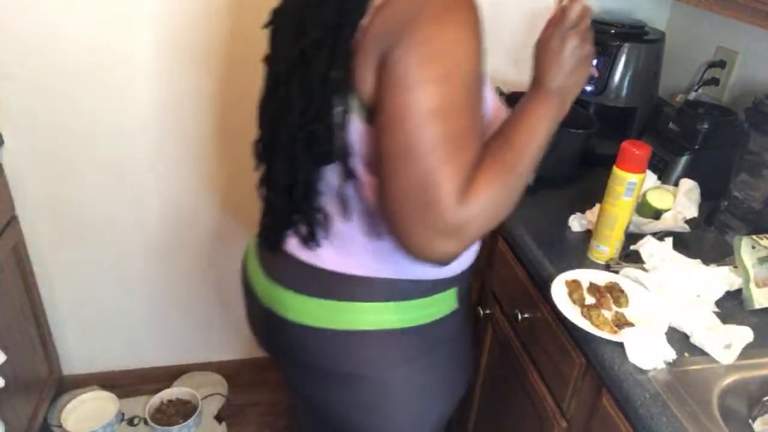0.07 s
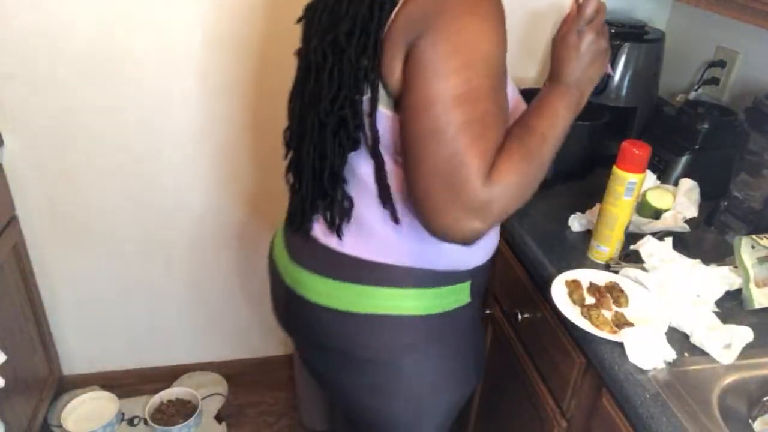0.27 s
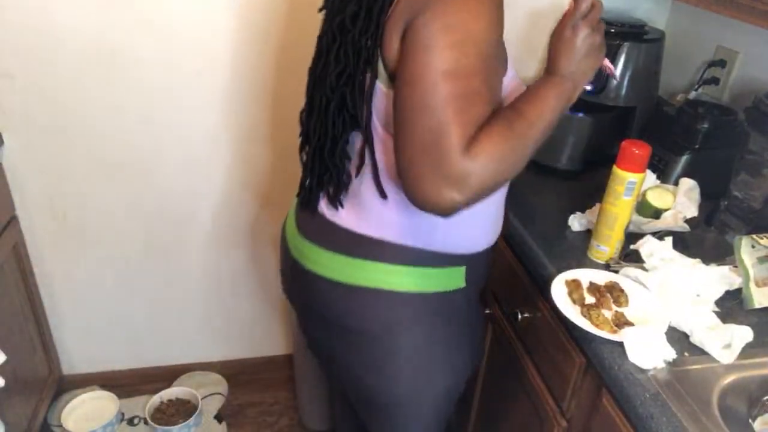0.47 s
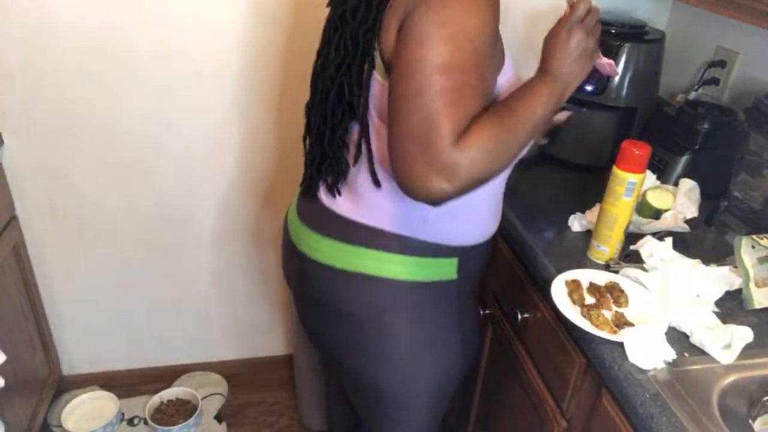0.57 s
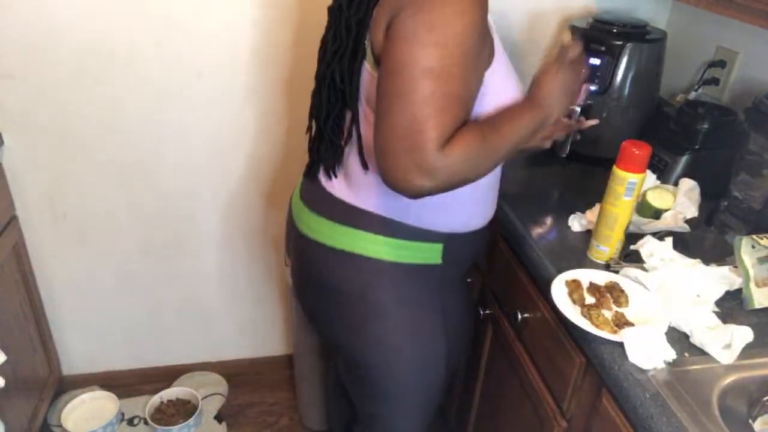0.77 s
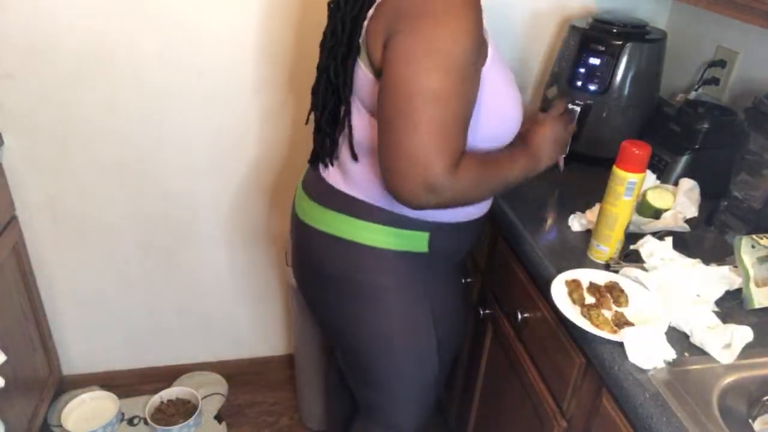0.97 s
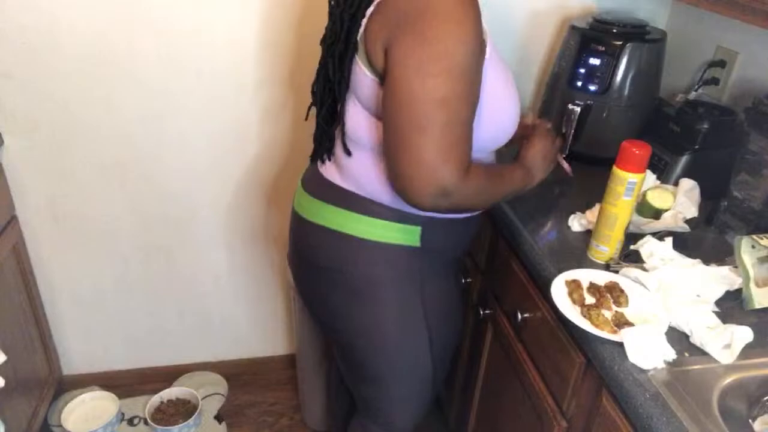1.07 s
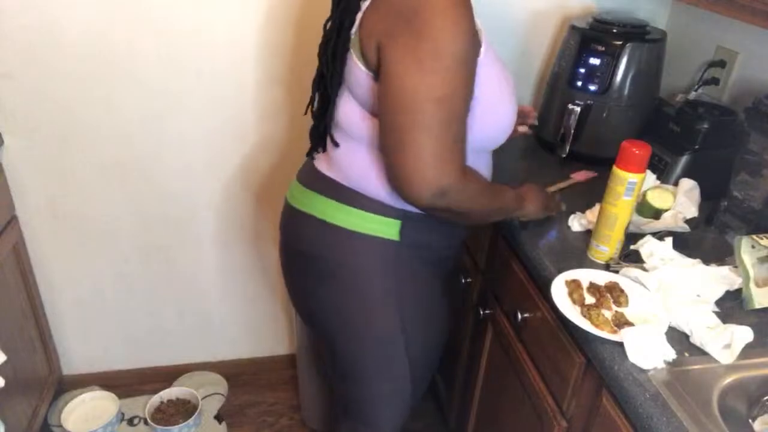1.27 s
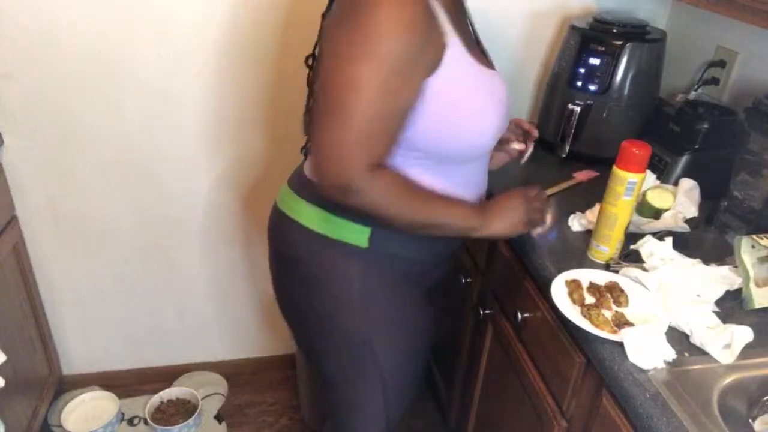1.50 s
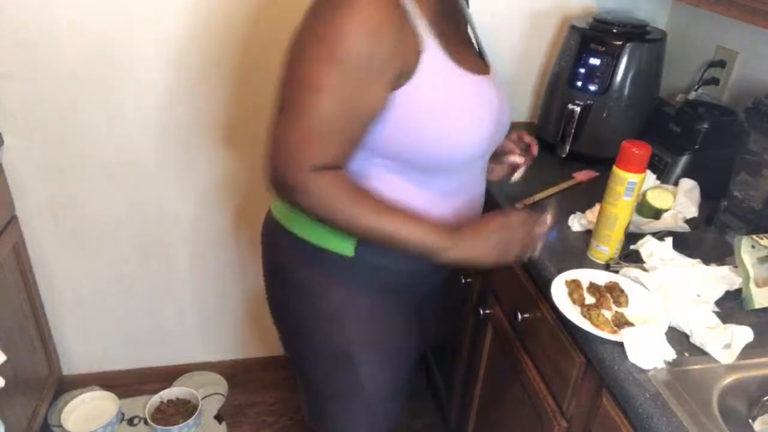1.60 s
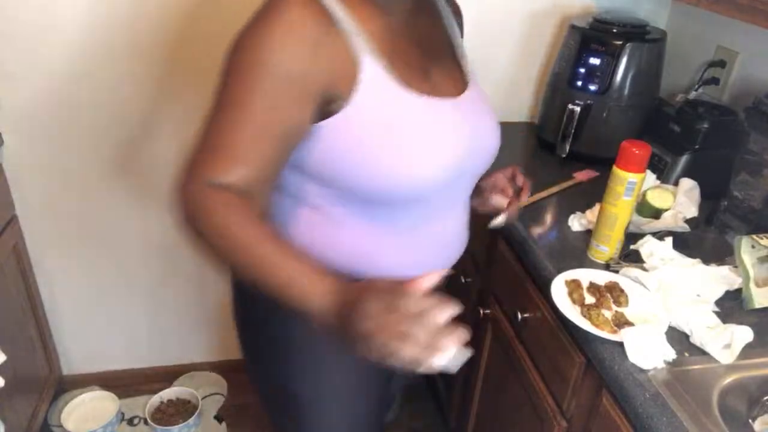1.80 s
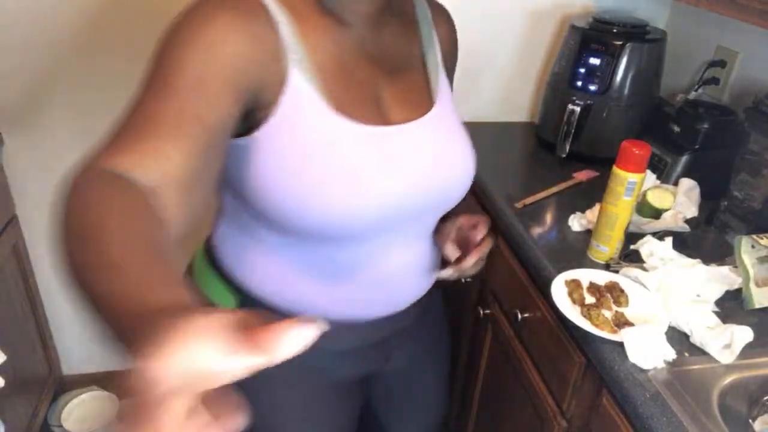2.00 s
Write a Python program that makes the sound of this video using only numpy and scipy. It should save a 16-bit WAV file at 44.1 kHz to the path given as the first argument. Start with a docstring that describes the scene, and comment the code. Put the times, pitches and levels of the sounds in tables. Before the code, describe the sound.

An air fryer basket bumps, scrapes along its runners and clunks shut, hollow and rattly, over a low fan hum; then a utensil clicks on the counter. Close phone microphone in a small kitchen.

```python
"""Air fryer basket going home

In a small kitchen, an air fryer's basket is set on its runners, scrapes in and shuts with a hollow clunk:
damped low notes, ringing housing modes, a dense pan rattle and random catches along the runners.
The fan, two tones and hum over coloured noise, coasts and then spins up; its rush is muffled as the basket shuts.
A moment later a utensil clicks down on the counter and bounces, as short bursts of decaying noise."""
import sys
import numpy as np
from scipy import signal
from scipy.fft import rfft, irfft
from scipy.io import wavfile

SR = 44100
rng = np.random.default_rng(int(sys.argv[2]) if len(sys.argv) > 2 else 0)


def store_wav(level_fs):
    """Save 16-bit WAV to argv[1]."""
    pcm = np.round(np.clip(np.atleast_2d(level_fs), -1, 1) * 32767)
    wavfile.write(sys.argv[1], SR, pcm.T.astype(np.int16))


N = 90404  # length in samples

# bumps of the basket: start_s, thump_db, thump_pitch_hz, housing_db, pan_clatter_db, edge_tick_db
BASKET_BUMPS = [(0.148, -38, 155, -60, -28, -42), (0.164, -27.5, 158, -57, -42, -60),
                (0.207, -17.5, 261.6, -33, -33.5, -43), (0.236, -18.5, 266.4, -46, -40, -56),
                (0.327, -61, 292, -42, -32.5, -46), (0.397, -31, 283, -53, -52, -45.5),
                (0.423, -25, 227, -39, -26, -30), (0.44, -16.5, 224, -42, -19, -27.5),
                (0.452, -14.5, 250.5, -26, -22, -47), (0.499, -56, 252, -31, -45, -36),
                (0.547, -18, 295, -28, -23, -25.5), (0.595, -19, 259, -13.5, -17.5, -53),
                (0.624, -14.5, 240.4, -19, -21, -39), (0.667, -6, 231.8, -43, -34, -54),
                (0.686, -13.5, 262, -10.5, -15.5, -49), (0.697, -10, 208.4, -18.5, -17, -55),
                (0.712, -8, 263.1, -19.5, -35, -54)]
# spectrum of the pan's dense ring: frequency_hz, density_db_per_hz (relative)
PAN_COLOUR = [(30, -50), (70, -6), (150, 1), (380, 4), (620, 2.5), (1000, -3), (1500, -16), (2300, -24),
              (3500, -28), (5000, -35.5), (15000, -63)]
PAN_T60_S = 0.068
CONTACT_S = 0.001  # default build-up time of a dense ring


def undb(db):
    """Decibels to gain."""
    return 10 ** (np.asarray(db) / 20)


def unit(x):
    """Scale to rms 1."""
    return x / np.sqrt(np.mean(x ** 2))


def unit_energy(response):
    """Scale an impulse response to a total energy of 1."""
    return response / np.sqrt(np.sum(response ** 2))


def seconds():
    """Time of every sample."""
    return np.arange(N) / SR


def bins():
    """Frequency of every spectral bin."""
    return np.arange(N // 2 + 1) * SR / N


def along(points, hz):
    """Read (Hz, value) points on a log-frequency axis."""
    point_hz, value = np.array(points).T
    return np.interp(np.log(hz + 1), np.log(point_hz), value)


def noise(colour):
    """Noise of rms 1 with a given spectrum."""
    spectrum = rfft(rng.standard_normal(N)) * undb(along(colour, bins()))
    return unit(irfft(spectrum, N))


def walk(rate_hz):
    """Slow random drift of rms 1, smoothed by a Gaussian low-pass."""
    spectrum = rfft(rng.standard_normal(N)) * np.exp(-(bins() / rate_hz) ** 2)
    return unit(irfft(spectrum, N))


def through(x, response):
    """Pass a signal through an impulse response."""
    return signal.fftconvolve(x, response)[:N]


def fade(t, t60_s):
    """Exponential decay that loses 60 dB in t60_s."""
    return np.exp(-np.log(1000) * t / t60_s)


def blows(times_s, db):
    """One impulse for each contact."""
    out = np.zeros(N)
    np.add.at(out, (times_s * SR).astype(int), undb(db))
    return out


def ring(modes):
    """Response of a few clear modes, each a decaying sine (Hz, dB, t60 s)."""
    t = seconds()
    return sum(undb(db) * np.sin(2 * np.pi * hz * t) * fade(t, t60_s) for hz, db, t60_s in modes)


def crash(colour, t60_s, swell_s=CONTACT_S):
    """Response of modes too dense to tell apart: decaying noise that builds up over a moment."""
    t = seconds()
    return noise(colour) * fade(t, t60_s) * (1 - np.exp(-t / swell_s))


def thumps():
    """Each bump of the basket gives one low, quickly damped note with a soft onset."""
    t60_s, rise_s = 0.11, 0.0051
    out = np.zeros(N)
    swell = 1 - np.exp(-(seconds() / rise_s) ** 2)
    for start_s, thump_db, pitch_hz, *_ in BASKET_BUMPS:
        at = int(start_s * SR)
        note = swell * ring([(pitch_hz, thump_db, t60_s)])
        out[at:] += note[:N - at]
    return out


def housing():
    """Ring of the hollow housing, which radiates neither deep bass nor treble."""
    # modes of the housing, before the band-pass: pitch_hz, level_db, t60_s
    modes = [(142, -28, 0.22), (181.4, -10.5, 0.44), (255.7, -8.5, 0.27), (393.2, -12, 0.27),
             (434.7, -16.5, 0.24), (493.6, -12.5, 0.175), (582.7, -12, 0.27), (615, -13, 0.17),
             (686.8, -14, 0.15), (748.3, -20.5, 0.28), (811, -26, 0.27), (905, -24, .18),
             (1011, -30.5, 0.27), (1355, -26.5, 0.12), (1684, -20, .05)]
    radiation = signal.butter(2, [150, 1500], "band", fs=SR, output="sos")
    return signal.sosfilt(radiation, ring(modes))


def knocks():
    """Each bump rings the housing, rattles the pan and ticks at its edge."""
    # spectrum of the pan edge's tick: frequency_hz, density_db_per_hz (relative)
    edge_colour = [(300, 15), (1500, -3.5), (2500, 3.5), (3700, 7), (4600, -4.5), (5500, 0.5), (6500, -13),
                   (8000, -6), (11000, -13), (15500, -25)]
    edge_t60_s, pan_swell_s = 0.026, 0.0044
    start_s, _, _, housing_db, pan_db, edge_db = np.array(BASKET_BUMPS).T
    out = through(blows(start_s, housing_db), housing())
    for at, clatter_db, tick_db in zip((start_s * SR).astype(int), pan_db, edge_db):
        clatter = undb(clatter_db) * crash(PAN_COLOUR, PAN_T60_S, pan_swell_s)
        tick = undb(tick_db) * crash(edge_colour, edge_t60_s)
        out[at:] += (clatter + tick)[:N - at]
    return out


def scrape():
    """The runners catch and slip hundreds of times a second, shaking pan and housing, with grit and hiss."""
    # course of the sliding: time_s, grinding_db, grit_db, hiss_db
    slide = [(.13, -44, -69, -76), (.16, -49.5, -58, -60), (.21, -38, -68, -52), (.25, -46, -61, -61),
             (.30, -74, -75, -83), (0.409, -55, -62, -67), (0.449, -31, -40.5, -43),
             (0.479, -36.5, -59, -56.5), (.53, -39, -61, -54.5), (.57, -26, -50, -51.5),
             (.62, -34.5, -52.5, -54.5), (.66, -29.5, -38, -52), (0.679, -33, -55, -51),
             (0.704, -47, -58, -51), (.745, -33.5, -62, -66), (.80, -59, -74, -68)]
    # spectrum of the runners' gritty rub: frequency_hz, density_db_per_hz (relative)
    grit_colour = [(400, -26), (1250, 5.5), (1800, 6), (2500, -5), (3700, -5), (5000, -9), (7000, -14.5),
                   (15000, -38)]
    # spectrum of the runners' hiss: frequency_hz, density_db_per_hz (relative)
    hiss_colour = [(300, -22), (1900, 11), (3000, 1), (6500, -3.5), (8500, 0.5), (11000, -4), (15500, -10)]
    catches_per_s, catch_spread_db = 700, 3
    housing_offset_db, hiss_rough_db = -0.5, 2
    time_s, grind_db, grit_db, hiss_db = np.array(slide).T

    # sparse impulses of random strength, under a drift in level
    caught = rng.random(N) < catches_per_s / SR
    catches = unit(caught * rng.standard_normal(N) * undb(catch_spread_db * walk(40)))

    def course(db):
        return np.interp(seconds(), time_s, db, left=-120, right=-120)

    def rub(response, db):
        return through(catches * undb(course(db)), unit_energy(response))

    pan_grind = rub(crash(PAN_COLOUR, PAN_T60_S), grind_db)
    housing_grind = rub(housing(), grind_db + housing_offset_db)
    grit = rub(crash(grit_colour, PAN_T60_S), grit_db)
    hiss = noise(hiss_colour) * undb(course(hiss_db) + hiss_rough_db * walk(200))
    return pan_grind + housing_grind + grit + hiss


def utensil():
    """A hard, bright click on the counter with a short ring and a few small bounces."""
    # contacts of the utensil: start_s, knock_db, ring_db
    taps = [(1.235, -28.5, -38.5), (1.2389, -32, -45), (1.243, -32.5, -57), (1.268, -39, -69),
            (1.301, -40.5, -74), (1.352, -43.5, -65)]
    # spectrum of its knock on the counter: frequency_hz, density_db_per_hz (relative)
    knock_colour = [(150, -7), (380, 16), (650, 8), (1000, 5), (1700, -1), (2400, -12), (3050, 1.5),
                    (3600, -18), (4400, 0.5), (4900, -7.5), (5600, -5), (7000, -7.5), (9000, -26),
                    (12000, -15), (15500, -19)]
    # spectrum of its bright, dense ring: frequency_hz, density_db_per_hz (relative)
    ring_colour = [(1500, -13), (3000, -16), (7000, -7.5), (8400, 0), (9200, -3), (10700, -5), (12500, -10),
                   (15500, -22)]
    knock_t60_s, ring_t60_s = 0.027, 0.11
    out = np.zeros(N)
    for start_s, knock_db, ring_db in taps:
        at = int(start_s * SR)
        knock = undb(knock_db) * crash(knock_colour, knock_t60_s)
        bright_ring = undb(ring_db) * crash(ring_colour, ring_t60_s)
        out[at:] += (knock + bright_ring)[:N - at]
    return out


def fan_phase():
    """Phase of the blade tone: pitch sinks while coasting, then climbs exponentially towards full speed."""
    coast_hz, coast_hz_per_s, full_hz = 292, 28, 307
    restart_s, spin_up_s = 0.5, 0.56
    t = seconds()
    coasting_hz = coast_hz - coast_hz_per_s * np.minimum(t, restart_s)
    lag = np.exp(-np.maximum(t - restart_s, 0) / spin_up_s)
    blade_hz = full_hz + (coasting_hz - full_hz) * lag
    return 2 * np.pi * np.cumsum(blade_hz) / SR


def fan_air():
    """Rushing air and duct resonances; an extra, brighter rush is heard until the basket shuts it off."""
    # spectrum of the steady rush: frequency_hz, density_db_per_hz (relative)
    rush_colour = [(25, -35), (50, -23.5), (80, -11), (115, -5), (160, -2.5), (195, -0.5), (250, 2.5),
                   (300, -6.5), (340, -12.5), (385, -4.5), (450, -16), (700, -18), (1400, -26), (2300, -33),
                   (3300, -39), (5500, -47), (9000, -49.5), (15500, -52.5)]
    # spectrum of the extra rush while the basket is out: frequency_hz, density_db_per_hz (relative)
    open_colour = [(40, -30), (70, -8), (150, -14), (220, -17), (280, -6), (380, 6), (600, -4.5),
                   (1000, -11.5), (1500, -19.5), (2500, -23.5), (5000, -33), (9000, -48), (15500, -74)]
    # air resonances of the ducts, as narrow noise bands: pitch_hz, width_hz, level_db
    ducts = [(193.2, 23, -47), (247.8, 24, -48.5), (2122, 140, -68.5), (3890, 250, -75)]
    rush_db, open_db = -41.5, -43.5
    open_drop_db = -2.5  # ducts and steady rush are weaker while the basket is out
    t = seconds()
    opening = (t <= 0.59).astype(float)  # 1 while the rush is open, then 0 at once
    duct = 0
    for pitch_hz, width_hz, level_db in ducts:
        drift = signal.hilbert(walk(width_hz))
        carrier = np.exp(2j * np.pi * (pitch_hz - width_hz / 2) * t)
        duct = duct + undb(level_db) * unit(np.real(drift * carrier))
    steady = (duct + undb(rush_db) * noise(rush_colour)) * undb(open_drop_db * opening)
    return steady + undb(open_db) * opening * noise(open_colour)


def fan():
    """Two tones follow the motor's speed, over mains hum and rushing air."""
    # rms levels of the two tones: time_s, blade_db, upper_db
    tone_levels = [(0, -46.5, -59.5), (.4, -46, -76), (.9, -39.5, -62.5), (1.15, -46, -62),
                   (1.32, -39, -62), (1.5, -40, -69.5), (1.65, -41.5, -61), (2.04, -43, -53.5)]
    upper_ratio = 11 / 6  # multiple of the blade tone
    mains_hz, mains_db = 119.1, -56.5
    t, phase = seconds(), fan_phase()
    time_s, blade_db, upper_db = np.array(tone_levels).T
    blade = undb(np.interp(t, time_s, blade_db)) * np.sin(phase)
    upper = undb(np.interp(t, time_s, upper_db)) * np.sin(upper_ratio * phase)
    mains = undb(mains_db) * np.sin(2 * np.pi * mains_hz * t)
    return np.sqrt(2) * (blade + upper + mains) + fan_air()  # root 2 turns rms into peak


def kitchen():
    """Diffuse echo of the room: noise in octave bands that fade at their own rates."""
    # decay time of the echo: frequency_hz, t60_s
    room_t60 = [(200, 0.35), (1000, 0.34), (5000, 0.33), (15000, 0.2)]
    # strength of the echo: frequency_hz, level_db (relative)
    room_colour = [(120, -10), (250, -1), (500, -1.5), (1000, 0.5), (15000, 0)]
    delay_s = 0.0037
    t = seconds() - delay_s
    spectrum, out = rfft(rng.standard_normal(N)), 0
    for hz in 2. ** np.arange(6, 15):  # octave centres, 64 Hz to 16384 Hz
        in_band = (bins() >= hz / np.sqrt(2)) & (bins() < hz * np.sqrt(2))
        band = irfft(spectrum * in_band, N)
        out = out + undb(along(room_colour, hz)) * band * fade(t, along(room_t60, hz)) * (t > 0)
    return unit_energy(out)


def scene():
    """Basket and utensil in the room, over the fan; thumps and fan stay out of the echo."""
    basket_echo_db, tap_echo_db = -9.5, -7
    basket, tap = knocks() + scrape(), utensil()
    echo = through(undb(basket_echo_db) * basket + undb(tap_echo_db) * tap, kitchen())
    return (thumps() + basket + tap + echo + fan())[None]


def record(dry):
    """The phone cuts the deepest bass, below 38 Hz, and the top, above 15650 Hz."""
    low_cut = signal.butter(2, 38, "high", fs=SR, output="sos")
    top_cut = signal.ellip(10, .2, 80, 15650, fs=SR, output="sos")
    return signal.sosfilt(top_cut, signal.sosfilt(low_cut, dry))


dry = scene()
out = record(dry)
store_wav(out)
```